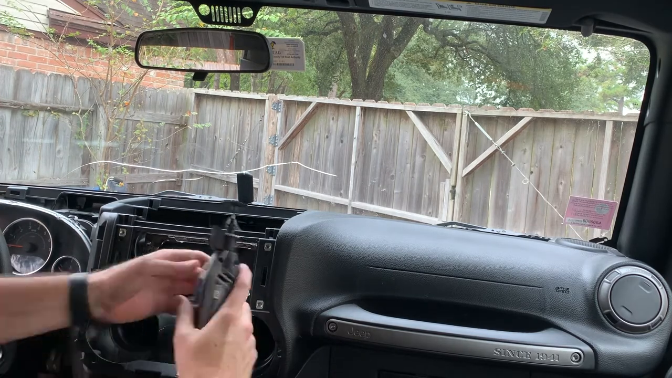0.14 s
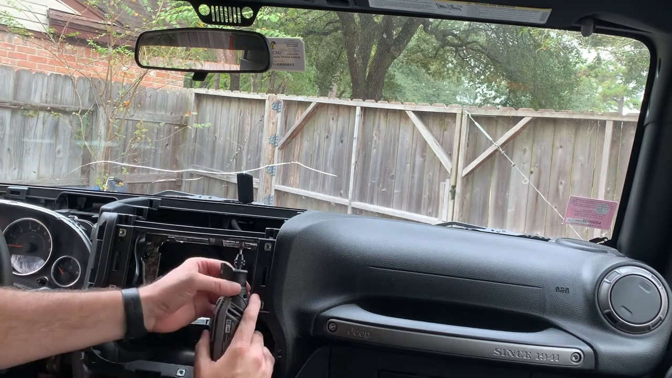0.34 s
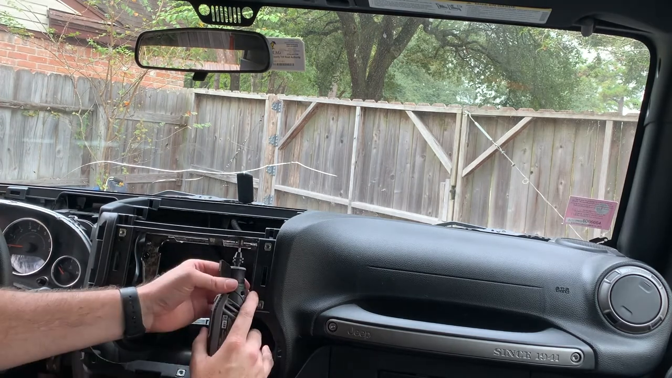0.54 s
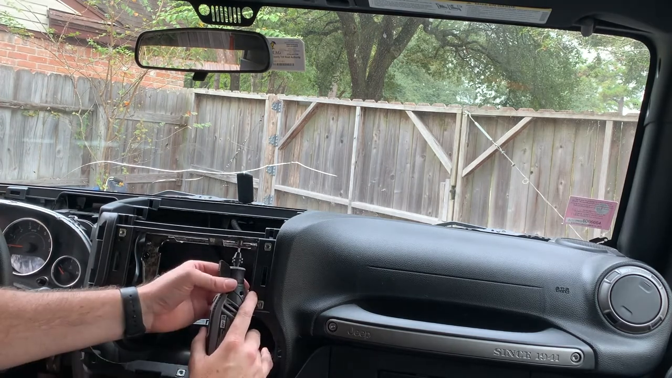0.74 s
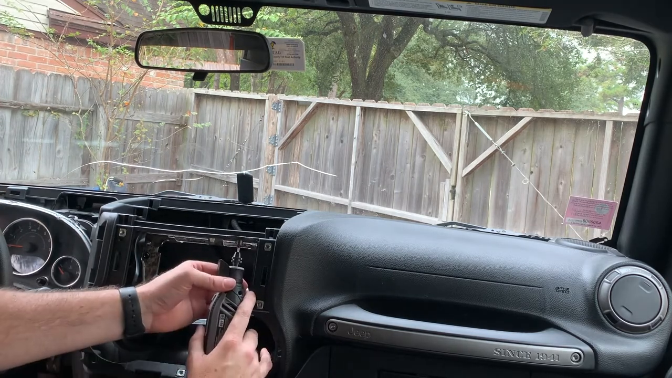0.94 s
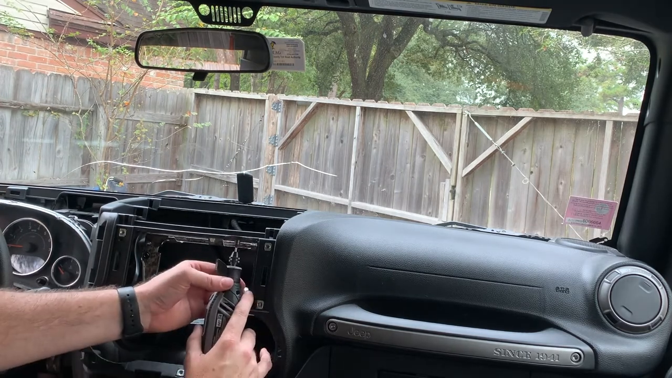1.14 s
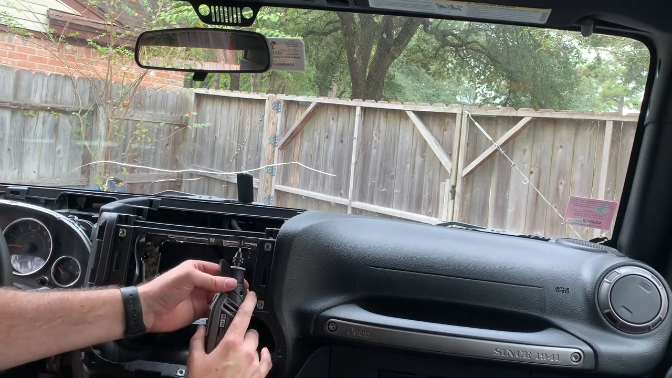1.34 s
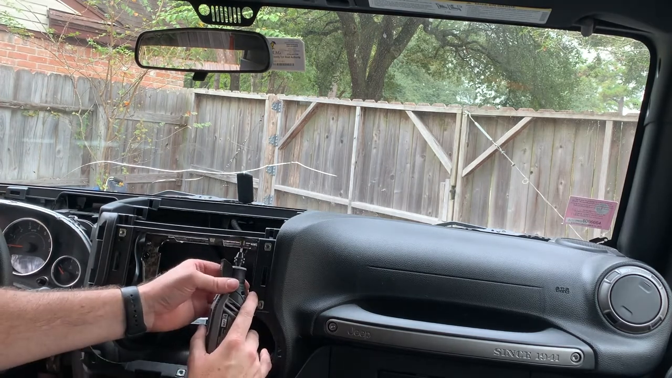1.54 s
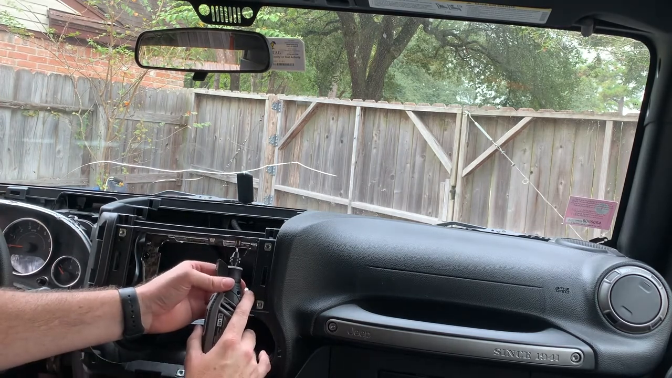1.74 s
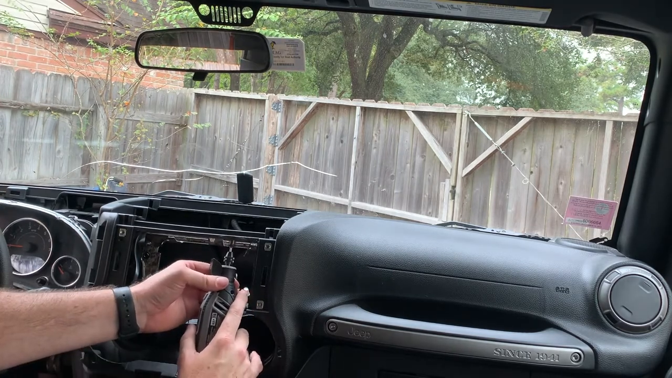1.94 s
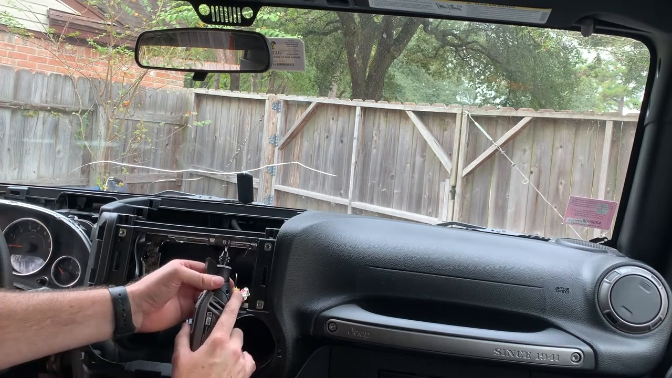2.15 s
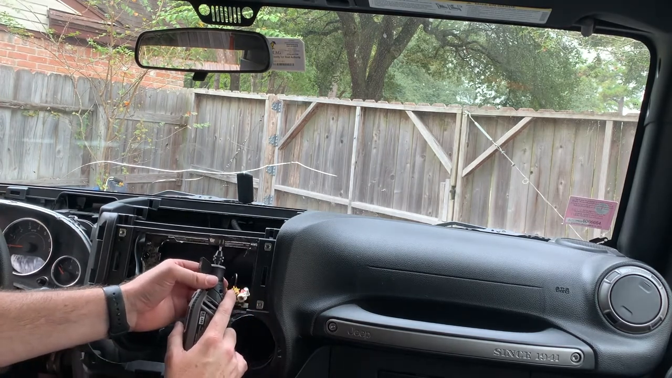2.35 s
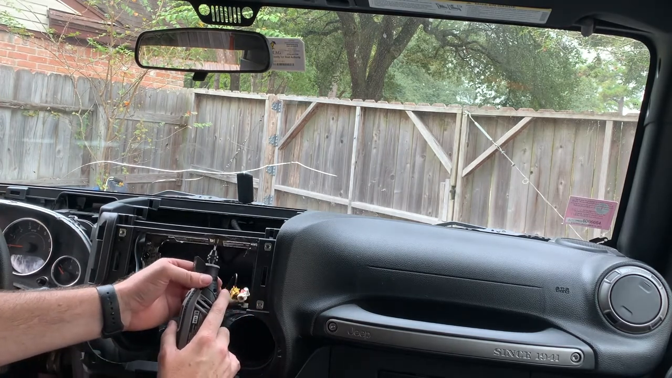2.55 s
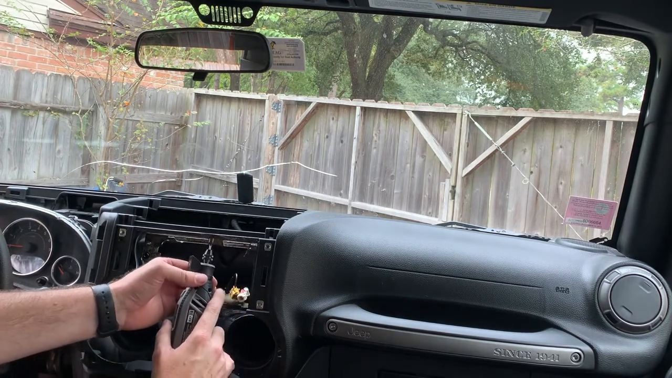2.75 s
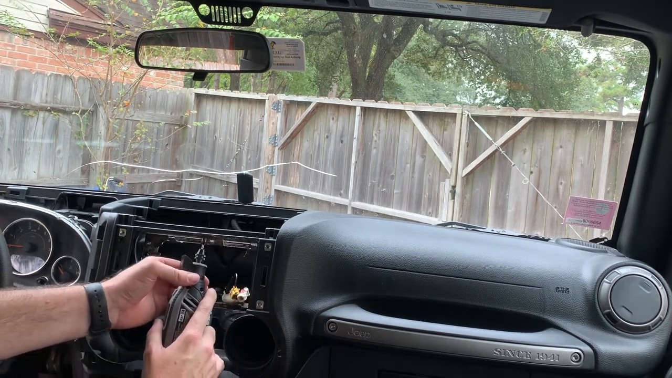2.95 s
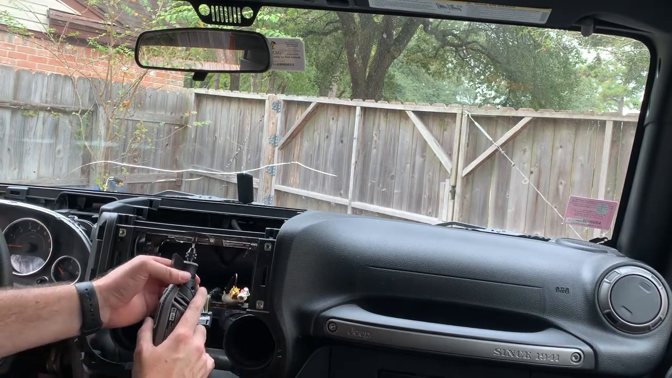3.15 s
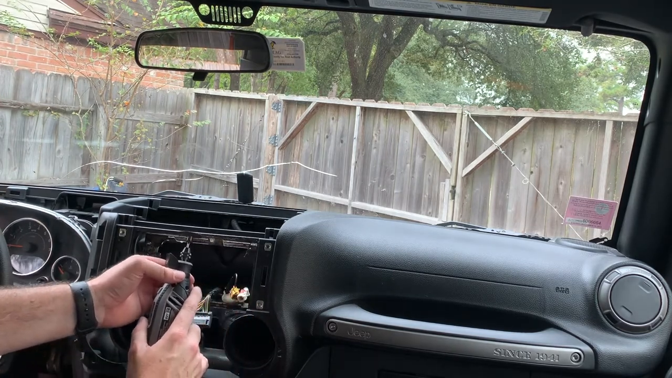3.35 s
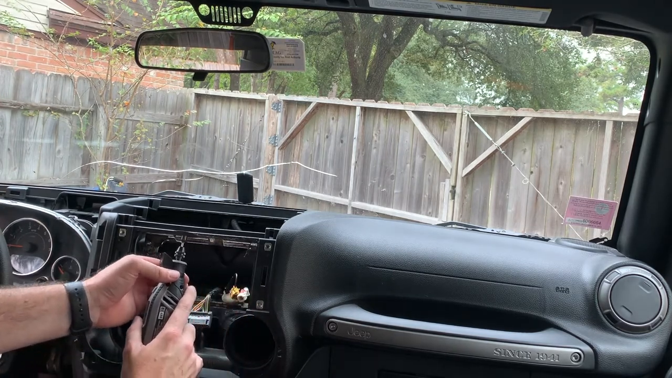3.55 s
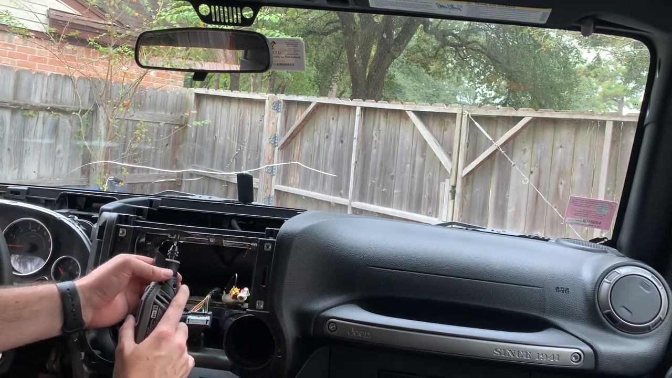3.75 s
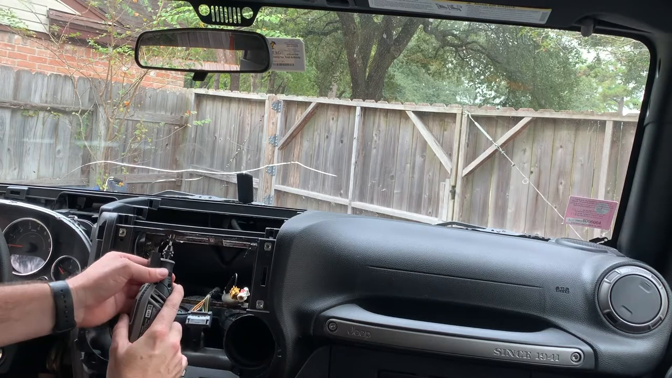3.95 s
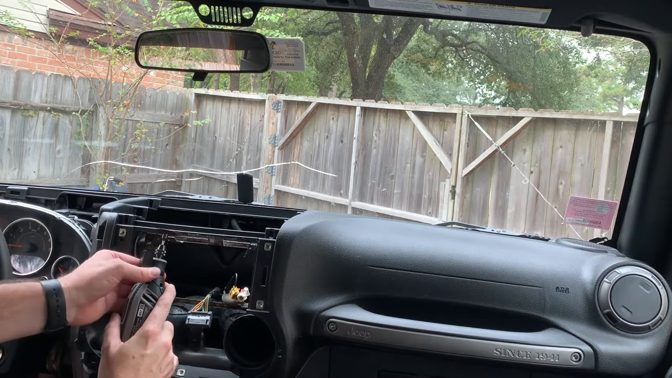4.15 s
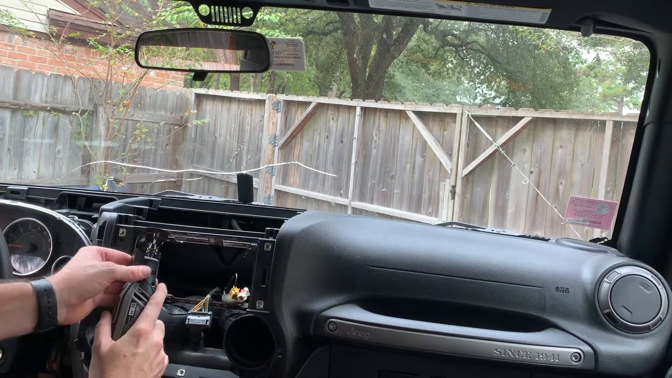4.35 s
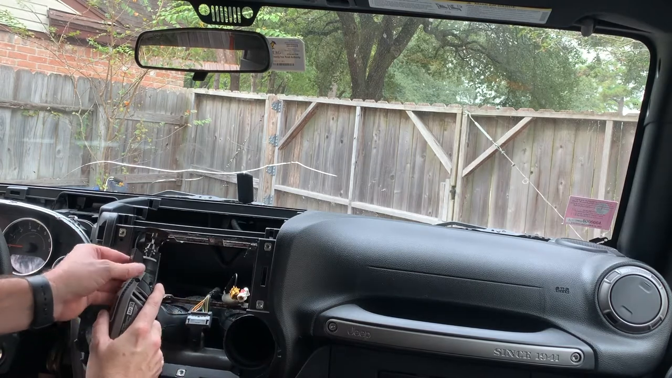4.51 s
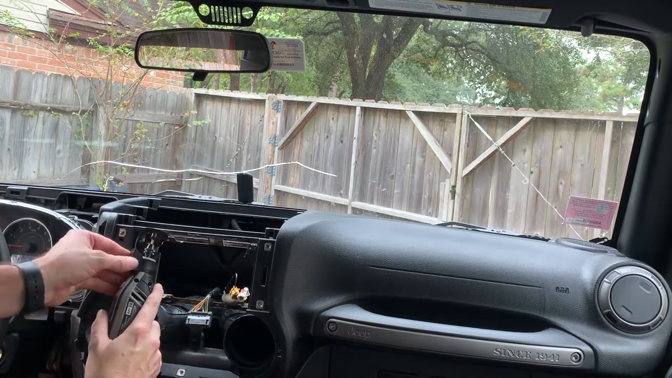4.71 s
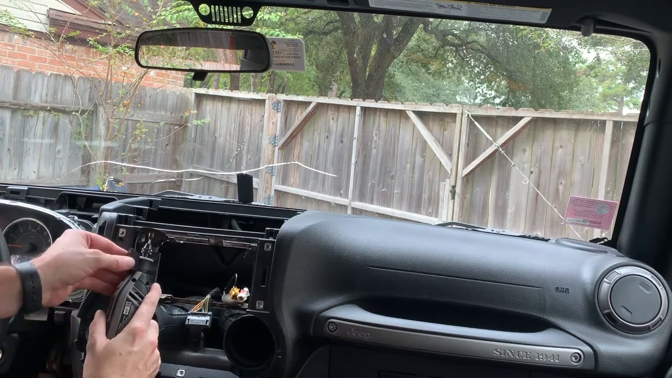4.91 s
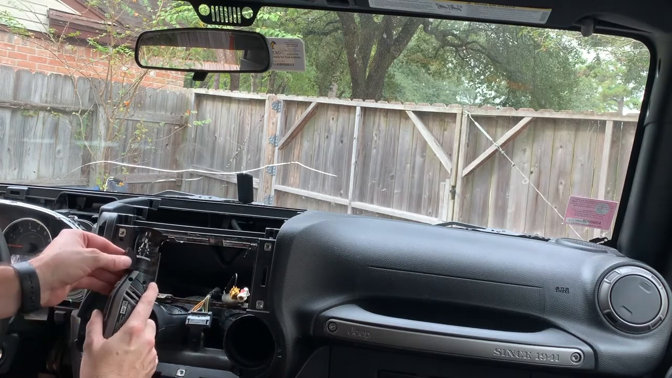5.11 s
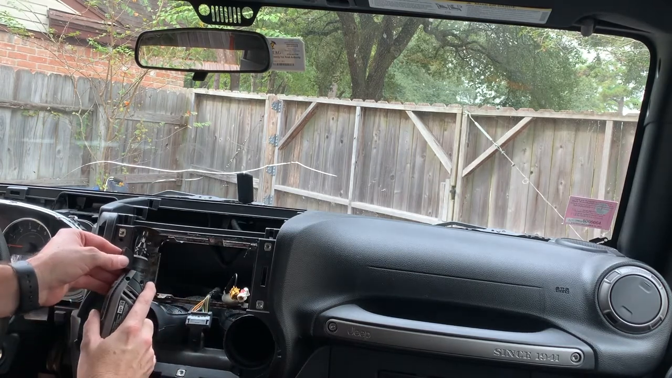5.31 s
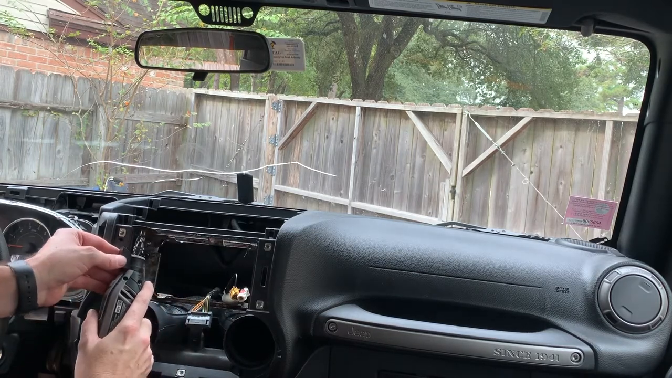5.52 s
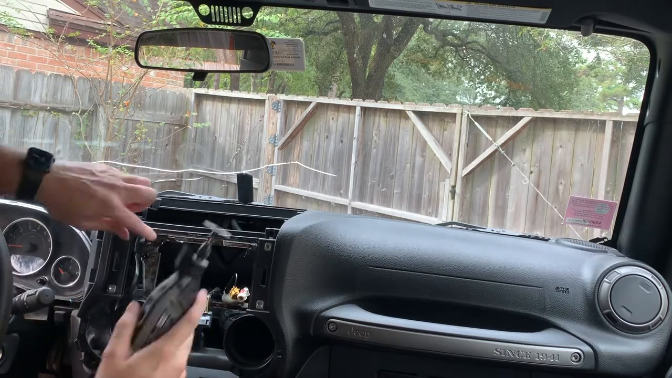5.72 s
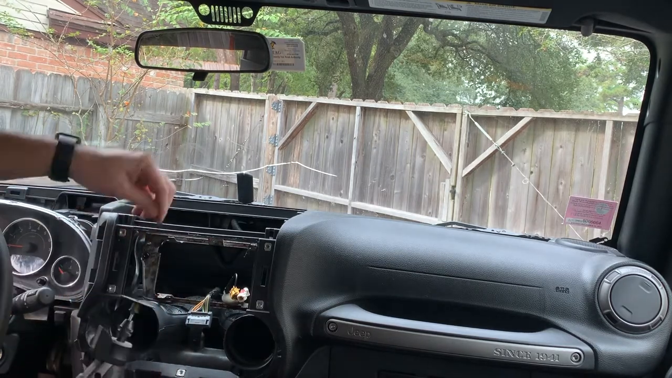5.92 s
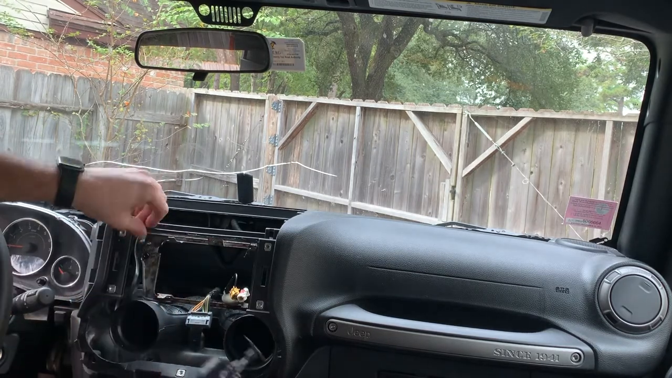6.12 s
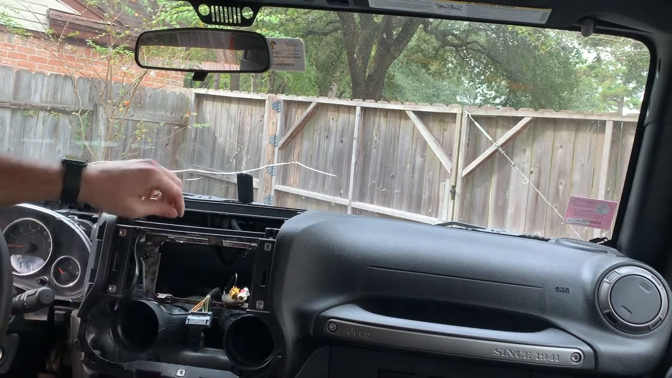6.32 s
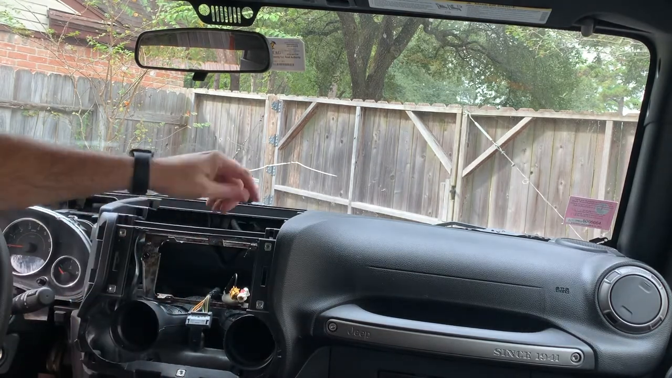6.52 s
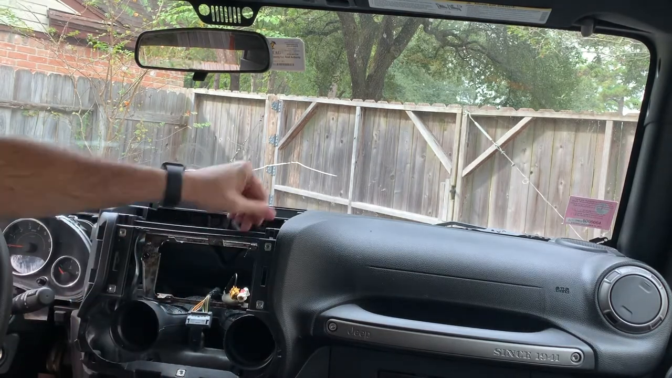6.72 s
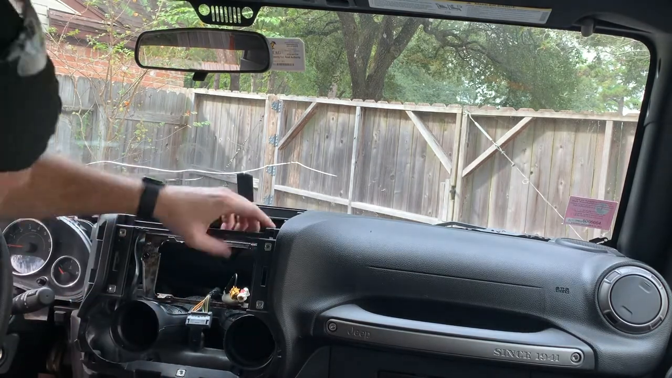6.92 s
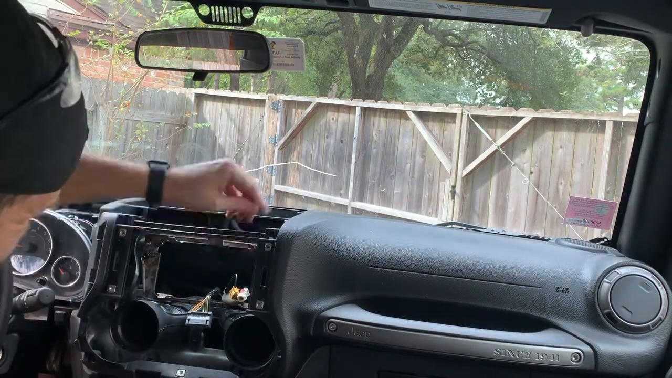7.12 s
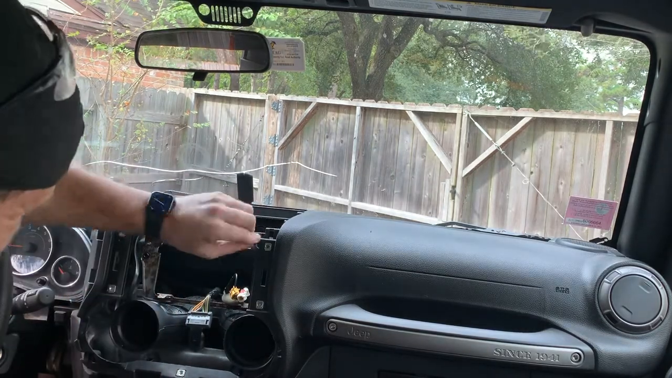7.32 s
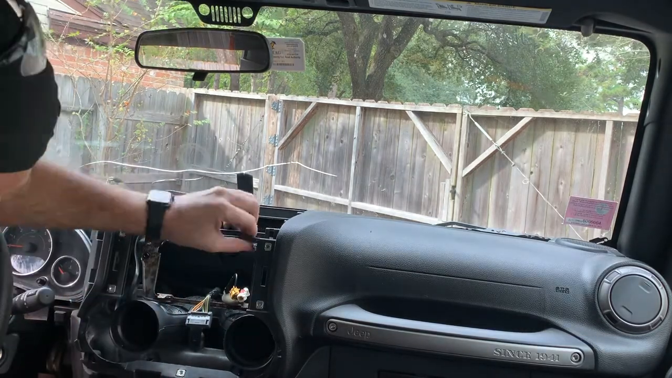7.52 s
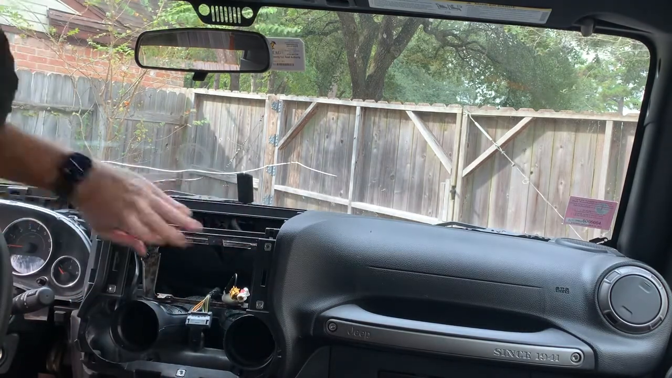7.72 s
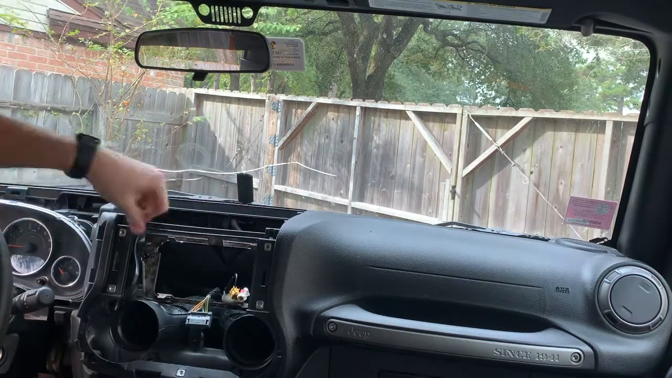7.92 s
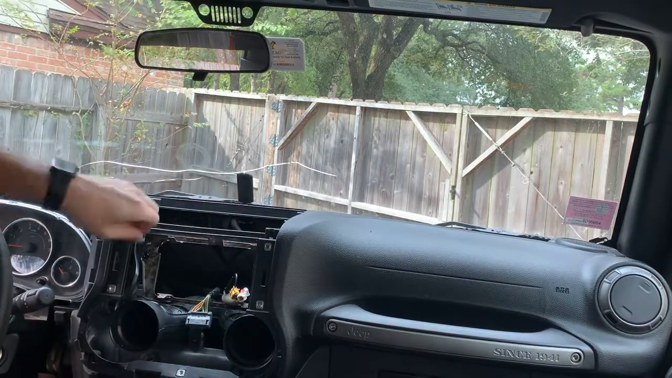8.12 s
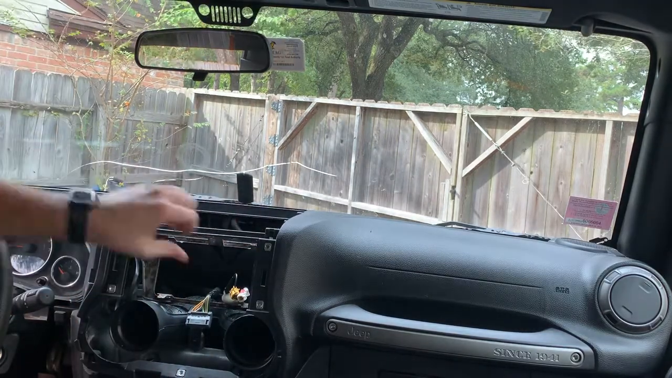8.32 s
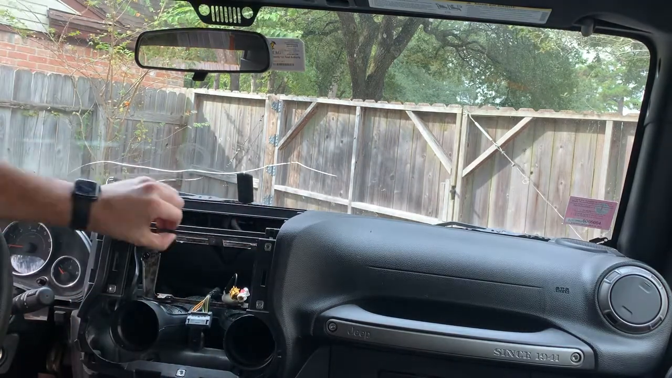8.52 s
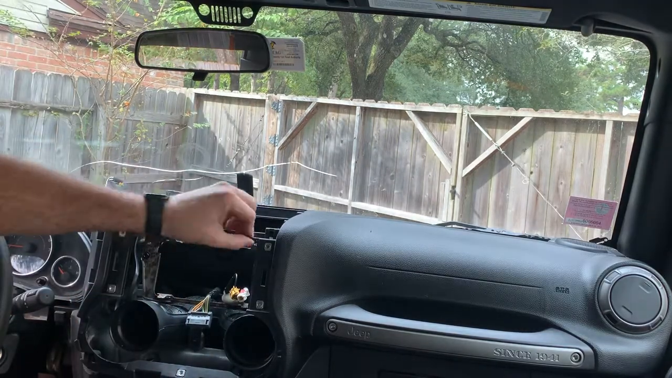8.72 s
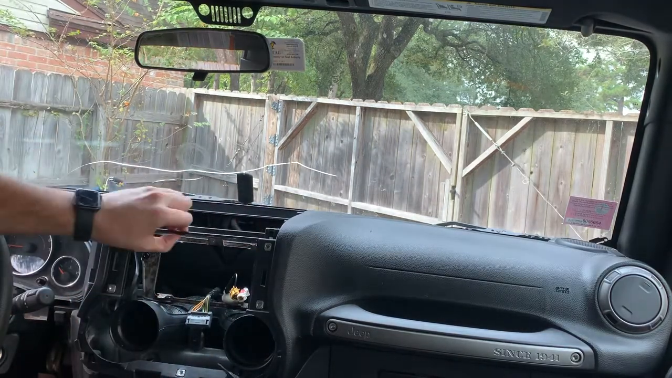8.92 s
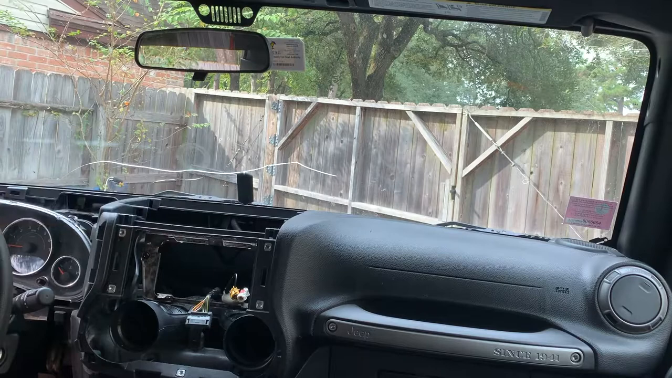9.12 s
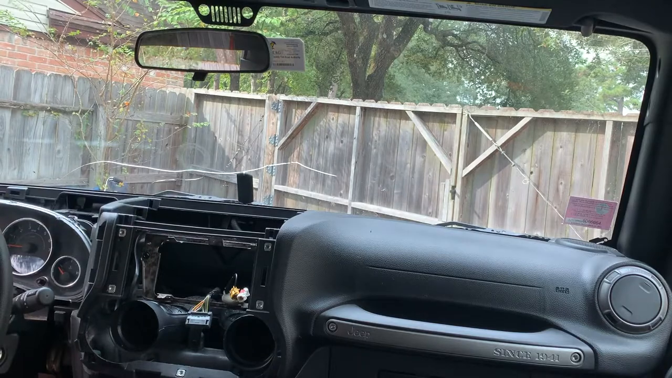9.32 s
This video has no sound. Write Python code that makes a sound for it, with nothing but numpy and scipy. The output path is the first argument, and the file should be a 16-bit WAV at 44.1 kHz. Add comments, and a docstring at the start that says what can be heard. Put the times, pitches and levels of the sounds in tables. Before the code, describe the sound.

A handheld rotary tool whines freely, then bites metal with a rough, wavering buzz and gritty scrape, screams, lifts off, clicks off; light taps follow.

```python
"""In the open dashboard of a parked vehicle, a handheld rotary tool trims a metal bracket.
Above cabin wash and hum, the free motor is a stack of shaft orders with fan air pulsing each turn.
The loaded disc sags in speed; its shaft orders drive the bracket's modes while its grit scrapes.
Lifted off, it spins free, clicks off and runs down; skin slides and decaying modes make
the brushes and taps on the plastic trim, and noise bursts are palms on the housing."""
import sys
import numpy as np
from scipy import signal
from scipy.fft import rfft, irfft, next_fast_len
from scipy.io import wavfile
from scipy.ndimage import uniform_filter1d, map_coordinates

SR = 44100
rng = np.random.default_rng(int(sys.argv[2]) if len(sys.argv) > 2 else 0)


def unload_wav(signal):
    """Save mono or channel-first audio to the path in sys.argv[1] as 16-bit WAV at rate SR, clipped to [-1, 1]."""
    wavfile.write(
        sys.argv[1],
        SR,
        np.round(np.clip(np.atleast_2d(signal).T, -1, 1) * 32767).astype(np.int16),
    )


N = 412776
T = np.arange(N) / SR  # s


def gain_of(db):
    """Logarithmic level: decibels to amplitude."""
    return 10 ** (np.asarray(db) / 20)


def evened(x):
    """Normalisation: scales to an rms of one."""
    return x / np.sqrt(np.mean(abs(x) ** 2) + 1e-20)


def read(points, hz):
    """Spectral envelope: straight lines on a log-frequency axis."""
    f, value = np.transpose(points)
    return np.interp(np.log(hz + 1), np.log(f + 1), value)


def curve(rows, axis=1):
    """Time envelope: one column of a table, interpolated at every sample."""
    rows = np.array(rows)
    return np.interp(T, rows[:, 0], rows[:, axis])


def shaped(x, gain):
    """Linear filtering: multiplies the spectrum of x by a function of frequency."""
    size = next_fast_len(len(x) + 2048)
    spectrum = rfft(x, size) * gain(np.fft.rfftfreq(size, 1 / SR))
    return irfft(spectrum, size)[:len(x)]


def coloured(x, points):
    """Linear filtering by a spectral envelope in dB."""
    return shaped(x, lambda f: gain_of(read(points, f)))


def band_rms(x, lo_hz, hi_hz):
    """Band level: standard deviation of x within a band."""
    return np.std(shaped(x, lambda f: (f > lo_hz) & (f < hi_hz))) + 1e-12


def resonances(modes, f):
    """Resonance: summed gain of modes (pitch_hz, width_hz, level_db), each falling off on both sides."""
    return sum(gain_of(db) / (1 + ((f - hz) / width) ** 2) for hz, width, db in modes)


def wander(rate):
    """Random modulation: interpolated chance of rms one, with a new value rate times a second."""
    return evened(np.interp(T * rate, np.arange(20000), rng.standard_normal(20000)))


def dips(rate, depth_db):
    """Amplitude modulation: a gain that mostly holds near one and drops briefly, by chance."""
    return gain_of(-depth_db * np.clip(wander(rate), 0, 1.5) ** 2)


def held(start, end, attack_s, release_s):
    """Gating envelope: rises around start, holds at one, and falls around end."""
    return np.clip(np.minimum((T - start) / attack_s, (end - T) / release_s) + .5, 0, 1)


def add(mix, s, sound):
    """Superposition: lays a sound into the mix at time s."""
    part = mix[round(s * SR):][:len(sound)]
    part += sound[:len(part)]


# Side signal against mid. Columns: pitch_hz, level_db
SIDE_LEVEL = [(60, -24), (110, -16), (200, -13.5), (380, -24.5), (700, -10.5), (1290, -20.5), (2380, -3),
              (4400, 1), (8120, -3), (15000, 0)]
# First channel against second. Columns: pitch_hz, level_db
LEAN = [(60, -3), (380, 0.5), (1290, 0.5), (2600, -3), (4400, 1.5), (8120, 1.3), (15000, 3)]


def ports(sound, other, likeness=.8, swing=.6):
    """Partial coherence: two ports share a sound in opposite quadrature, plus an unshared part."""
    likeness = np.clip(likeness, 0, 1)
    ripple = lambda f: swing * np.sin(2 * np.pi * f / 1370)
    quadrature = shaped(sound, lambda f: 1j * np.exp(1j * ripple(f)))
    side = coloured(likeness * quadrature + np.sqrt(1 - likeness ** 2) * other, SIDE_LEVEL)
    return np.array([shaped(sound + sign * side, lambda f: gain_of(sign * read(LEAN, f) / 2))
                     for sign in (1, -1)])


# Colour of the parked cabin's wash. Columns: pitch_hz, relative density_db
CABIN_COLOUR = [(15, -90), (25, -50), (53, -60), (80, -31.5), (145, -17.5), (206, -1.5), (405, -11.5),
                (489, -5.5), (545, -14.5), (624, -17.5), (754, -19), (863, -21.5), (936, -26.5),
                (1650, -32), (16000, -64.5)]
# Wavering partials of the hum. Columns: pitch_hz, waver_per_s, level_db
HUM = [(98, 16, -71.5), (173.6, 9, -51.5), (205, 13, -72), (274.8, 27, -52), (444, 8.3, -71),
       (484, 7.8, -56.5), (485, 4.7, -75), (605, 12, -57)]
# A thin tone swelling in the hum. Columns: start_s, end_s, level_db
TONE_SWELLS = [(1.361, 1.694, -38.5), (7.053, 7.852, -44.5)]
# A faint hiss that comes up late. Columns: time_s, level_db
HISS = [(9.15, -82), (9.22, -60.5), (9.36, -63)]
# Colour of that hiss. Columns: pitch_hz, relative density_db
HISS_COLOUR = [(2350, -42), (4000, -9), (7270, -17), (9280, -2), (10700, -9), (14000, -2.5), (16000, -12)]
CABIN_DB = -43
TONE_HZ, TONE_EDGE_S = 477, 0.053


def cabin():
    """Narrowband noise: a wash and wavering hum, alike at both ports in the bass, and late hiss."""
    wash, stray = (gain_of(CABIN_DB) * evened(coloured(rng.standard_normal(N), CABIN_COLOUR))
                   for _ in range(2))
    hum = np.zeros(N)
    for hz, waver, db in HUM:
        envelope = wander(waver) + 1j * wander(waver)
        hum += gain_of(db) * (envelope * np.exp(2j * np.pi * hz * T)).real
    swells = sum(gain_of(db) * held(start, end, TONE_EDGE_S, TONE_EDGE_S)
                 for start, end, db in TONE_SWELLS)
    tone = np.sqrt(2) * np.sin(2 * np.pi * TONE_HZ * T + .3 * wander(9))
    tone *= swells * gain_of(1.5 * wander(12))
    side = coloured(stray, [(400, -19), (1200, -3), (3000, 5.5), (9000, 3.0)])
    hiss = [gain_of(curve(HISS)) * evened(coloured(rng.standard_normal(N), HISS_COLOUR))
            for _ in range(2)]
    return wash + hum + tone + np.array([side, -side]) + hiss


# Palms rubbing and bumping. Columns: start_s, end_s, level_db, fade_s
GRIPS = [(-0.15, 0.5, -44, 0.2), (5.54, 5.606, -36, 0.022), (6.812, 6.846, -41, .008),
         (7.71, 7.745, -43, .01), (8.169, 8.204, -41, 0.0071)]
# Colour of the rubbing. Columns: pitch_hz, relative density_db
GRIP_COLOUR = [(30, -65), (100, -20), (300, 7.5), (560, -18), (900, -9), (2000, -57), (6000, -70)]


def grip(uneven_db=3):
    """Friction noise: palms rub and bump on the housing and the dashboard."""
    level = sum(gain_of(db) * held(start, end, fade, fade) for start, end, db, fade in GRIPS)
    rubbing = evened(coloured(rng.standard_normal(N), GRIP_COLOUR))
    return level * gain_of(uneven_db * wander(25.7)) * rubbing


# Mean shaft speed, sagging as the hand presses the disc on. Columns: time_s, turns_hz
SPEED = [(0.015, 536), (0.125, 480), (0.23, 466.8), (0.64, 463.5), (0.685, 448), (0.775, 329),
         (0.83, 387.8), (0.855, 391.6), (0.88, 381.8), (0.9, 351.0), (0.93, 325.9), (1.0, 328.6),
         (1.02, 302.8), (1.08, 314.2), (1.125, 309.0), (1.18, 320.8), (1.2, 302.7), (1.235, 294.5),
         (1.265, 299.3), (1.28, 294.3), (1.32, 307.7), (1.34, 287.1), (1.38, 275.1), (1.425, 297.2),
         (1.47, 295.8), (1.485, 269.8), (1.495, 263.5), (1.51, 270.3), (1.535, 266.3), (1.565, 297.7),
         (1.615, 318.0), (1.65, 290.8), (1.67, 296.6), (1.685, 311.9), (1.71, 359.9), (1.735, 357.6),
         (1.76, 328.1), (1.79, 312.7), (1.835, 354.3), (1.885, 368.4), (1.9, 359.3), (1.925, 366.2),
         (1.945, 358.4), (1.965, 370.5), (2.015, 342.9), (2.055, 332.7), (2.075, 318.2), (2.095, 313.9),
         (2.14, 321.8), (2.165, 311.1), (2.19, 321.7), (2.29, 316.6), (2.305, 307.6), (2.43, 309.0),
         (2.445, 298.8), (2.54, 299.8), (2.56, 287.0), (2.655, 298.7), (2.67, 290.3), (2.79, 287.3),
         (2.82, 276.9), (2.86, 277.0), (2.885, 288.9), (2.955, 276.5), (2.98, 288.4), (3.05, 283.8),
         (3.125, 268.2), (3.15, 285.6), (3.175, 284.5), (3.21, 263.7), (3.27, 288.2), (3.335, 294.5),
         (3.355, 301.5), (3.415, 265.4), (3.45, 270.9), (3.465, 279.4), (3.51, 287.3), (3.55, 279.9),
         (3.57, 285.6), (3.615, 279.9), (3.64, 266.2), (3.68, 234.8), (3.72, 269.4), (3.75, 269.0),
         (3.795, 252.5), (3.81, 251.9), (3.83, 238.7), (3.855, 238.1), (3.94, 277.6), (3.96, 269.4),
         (4.06, 266.7), (4.075, 276.5), (4.13, 278.9), (4.17, 266.5), (4.19, 274.9), (4.205, 270.4),
         (4.23, 281.7), (4.25, 274.8), (4.34, 273.4), (4.355, 267.6), (4.375, 276.5), (4.39, 270.0),
         (4.435, 283.8), (4.51, 282.9), (4.54, 291.6), (4.68, 269.3), (4.72, 279.0), (4.79, 269.6),
         (4.81, 276.8), (4.845, 303.3), (4.875, 283.2), (4.925, 282.6), (4.955, 273.8), (4.99, 253.6),
         (5.005, 237.2), (5.02, 228.9), (5.055, 234.3), (5.075, 224.6), (5.095, 235.9), (5.18, 229.1),
         (5.205, 241.2), (5.245, 226.3), (5.265, 229.5), (5.285, 224.8), (5.3, 230.0), (5.325, 224.9),
         (5.35, 235.5), (5.39, 226.5), (5.425, 236.8), (5.475, 225.6), (5.525, 233.9), (5.59, 246),
         (5.66, 375), (5.76, 448.7), (6.485, 500.5)]
# The switch. Values: time_s, level_db
SWITCH = (6.4562, -16.5)
FREE_HZ = 486.5  # speed without load, from which the sag is counted
HUNT_SHARE, HUNT_PER_S = .005, 60  # waver as a share of the sag, and its rate
COAST_HZ_PER_S, COAST_DB_PER_S = 370, 64  # running down after the switch


def shaft():
    """Torque balance: speed follows the hand's pressure, wavers under load, and runs down when off."""
    sag = np.maximum(FREE_HZ - curve(SPEED), 0)
    coast = COAST_HZ_PER_S * np.clip(T - SWITCH[0], 0, 1)
    return curve(SPEED) + HUNT_SHARE * sag * wander(HUNT_PER_S) - coast


def reflections(x, depth_db, span_hz=170, seconds=0.2918):
    """Comb-like interference: dashboard echoes ripple the spectrum, drifting as the hand moves."""
    hz, t, z = signal.stft(x, SR, nperseg=1024, noverlap=768)
    grid = np.meshgrid(hz / span_hz, t / seconds, indexing="ij")
    ripples = map_coordinates(rng.standard_normal((256, 96)), grid, order=1, mode="wrap")
    rippled = z * gain_of(depth_db * evened(ripples))
    return evened(signal.istft(rippled, SR, nperseg=1024, noverlap=768)[1][:N])


# Times at which the disc moves on to the next place along the cut. Column: time_s
MOVES = [1.65, 2.52, 4.79]


def recoloured(x, before, after):
    """Spectral crossfade: the free motor's colour before the cut, changing during it to that after."""
    changed = np.clip(T - MOVES[1], 0, 1)
    return (1 - changed) * evened(coloured(x, before)) + changed * evened(coloured(x, after))


# Relative level of the motor's cooling air and whine. Columns: time_s, level_db
AIR = [(0, -45), (.3, -47), (6.1, -47), (6.23, -45)]
# Low orders of the motor. Columns: multiple of the shaft speed, relative level_db
MOTOR = [(1, -54), (3, -63), (6, -68)]
# Gain of the low orders over time. Columns: time_s, level_db
MOTOR_LEVEL = [(0.25, -1.5), (0.45, 6), (0.7, 8.5), (5.6, -8)]
# Which high orders stand out before the cut. Columns: pitch_hz, relative level_db
WHINE_BEFORE = [(2000, -23), (3600, -7.5), (4700, -7.5), (6000, -23), (7800, 4.5), (8300, -1), (8750, 5.5),
                (9200, -11), (9700, 6), (10150, -2), (10650, 4), (11100, -13), (11700, 5.5), (13300, -8),
                (15300, 0)]
# Which high orders stand out after the cut. Columns: pitch_hz, relative level_db
WHINE_AFTER = [(2000, -23.5), (3200, -15), (4400, -13.5), (5200, -21.5), (7500, -10.5), (8900, -1),
               (10000, -2.5), (10900, -8.5), (11800, 0), (13400, -15.5), (15000, 0), (16000, -6)]
# Colour of the cooling air before the cut. Columns: pitch_hz, relative density_db
AIR_BEFORE = [(900, -19.5), (1420, 4), (2100, -17), (2800, -0.5), (3500, -13), (4800, 1.5), (5900, -31.5),
              (6500, -7), (7700, -2.5), (9200, -1), (10900, -9), (12100, -6.5), (13400, -5), (15100, -1),
              (16000, -16)]
# Colour of the cooling air after the cut. Columns: pitch_hz, relative density_db
AIR_AFTER = [(900, -21), (1420, 1.5), (2100, -16), (2800, -8.5), (3500, -12.5), (4300, -8), (5100, -14.5),
             (6300, -5), (7400, -10), (9100, -1.5), (10900, -9), (11900, -2.5), (13400, -12), (15100, -2),
             (16000, -16)]


def motor(speed, whine_db=-5.0, air_db=-3, flutter=1.0, buzz=0.66):
    """Rotating-machine orders: a tall stack of shaft multiples with fan air pulsing each turn."""
    turns = np.cumsum(speed * (1 + .0024 * wander(140))) / SR
    running = np.interp(T, [6.44, 6.6, 6.68], [1, 1, 0])
    powered = np.interp(T, [6.44, 6.58], [1, 0])
    level = gain_of(curve(AIR) - COAST_DB_PER_S * np.maximum(T - SWITCH[0], 0)) * running
    # play in the bearings makes every order flutter on its own
    stack = sum((1 + flutter * wander(50)) * np.cos(2 * np.pi * (k * turns + rng.random()))
                for k in range(5, 34))
    whine = gain_of(whine_db) * powered * recoloured(stack, WHINE_BEFORE, WHINE_AFTER)
    gusts = 1 + buzz * np.cos(2 * np.pi * turns)
    air, stray = (gain_of(air_db) * recoloured(reflections(gusts * rng.standard_normal(N), depth_db=4.0),
                                               AIR_BEFORE, AIR_AFTER) for _ in range(2))
    low = sum(gain_of(db + 2 * wander(9.0)) * np.sqrt(2) * np.cos(2 * np.pi * k * turns)
              for k, db in MOTOR)
    low = powered * gain_of(curve(MOTOR_LEVEL)) * low
    return ports(level * (air + whine) + low, level * stray, likeness=0.67)


# Fingers and tool on the trim.
# Columns: start_s, relative level_db, treble_db against body, scuff_t60_s, nominal spot_hz
TAPS = [(0.108, -51, -12, .06, 2400), (0.293, -34.5, -22, 0.037, 1240), (0.3587, -47, -10, 0.085, 1360),
        (6.4907, -46.5, -9, 0.15, 1310), (6.526, -50, -8, 0.044, 2800), (6.6338, -42, -24, 0.08, 1330),
        (6.6567, -47.5, -13, 0.052, 2350), (6.742, -48, -16, .17, 937), (6.814, -42, -31, .08, 1150),
        (6.8358, -46, -18, 0.092, 1690), (6.91, -49, -31, 0.08, 836), (6.932, -52, -24, .05, 2450),
        (7.13, -48.5, -6.5, 0.063, 2540), (7.448, -47, -37, 0.066, 1440), (7.5708, -46.5, -28, 0.09, 1330),
        (7.6177, -46.5, -32, 0.056, 1670), (7.636, -52, -25, 0.036, 1600), (7.722, -50, -20, 0.11, 1420),
        (7.753, -50, -4, 0.11, 1510), (7.878, -57, -3, .04, 1500), (7.893, -47, -22, 0.069, 1400),
        (7.909, -41.5, -20, 0.13, 1660), (7.964, -44, -20, .07, 1430), (7.981, -48, -25, 0.036, 1600),
        (8.054, -47.5, -27, 0.087, 1500), (8.1665, -38, -20, 0.016, 1424), (8.17, -47, -34, 0.02, 1170),
        (8.6968, -46, -21, 0.089, 845), (9.08, -57, -1, 0.045, 1390)]
# Nominal modes of the trim. Columns: pitch_hz, width_hz, relative level_db
TRIM = [(665, 110, -4), (914, 120, -2.5), (1330, 164, 9), (1680, 170, 3.5), (2610, 140, -5.5),
        (3170, 120, -14), (4280, 180, -14)]
SLIPS_PER_S = 330  # tiny slips of a finger on the trim


def taps(scuff_db=2.0, tick_db=-6, snap_db=-8, spot_db=4, spot_width_hz=90):
    """Modal impact and stick-slip: each touch knocks, then slips that ring the plastic and the spot."""
    out, t = np.zeros(N), np.arange(SR // 5) / SR
    rise_s, snap_s, press_s, vary_db = .002, .0006, .001, 2.5
    tick_colour = [(2000, -1), (4500, 11.0), (9000, 11.0), (16000, -10.0)]
    for s, db, treble_db, t60, spot_hz in TAPS:
        knock = np.zeros(len(t))
        for hz, width, level in TRIM + [(spot_hz, spot_width_hz, spot_db)]:
            decay = gain_of(level + vary_db * rng.standard_normal()) * np.exp(-np.pi * width * t)
            detuned_hz = hz * rng.uniform(0.955, 1.04)
            knock += decay * np.sin(2 * np.pi * detuned_hz * t) * rng.choice([-1, 1])
        knock *= 1 - np.exp(-t / press_s)  # the soft fingertip rounds the onset
        slips = evened(rng.choice([-1, 1], len(t)) * (rng.random(len(t)) < SLIPS_PER_S / SR))
        scuff = evened(signal.fftconvolve(slips, knock)[:len(t)])
        swell = (1 - np.exp(-t / rise_s)) * gain_of(-60 * t / max(t60, .01))
        snap = gain_of(snap_db) * np.exp(-t / snap_s) * rng.standard_normal(len(t))
        scratch = gain_of(tick_db) * swell * evened(slips + rng.standard_normal(len(t)))
        tick = gain_of(min(treble_db, 0)) * coloured(snap + scratch, tick_colour)
        add(out, s, gain_of(db) * (knock + gain_of(scuff_db) * swell * scuff + tick))
    # small plastic parts radiate little bass
    return ports(shaped(out, lambda f: f ** 2 / (f ** 2 + 300 ** 2)), np.zeros(N), likeness=0.88)


# The disc bites once, bounces clear, then stays on the metal.
# Columns: start_s, end_s, relative force_db of the tones, relative grit_db, easing_off_s
CONTACTS = [(0.702, 0.799, 7, -7, 0.063), (0.819, 5.64, 0, 0, 0.05)]
# The disc snags and the second order drops. Columns: start_s, end_s, level_db
SNAGS = [(3.107, 3.144, -19), (3.201, 3.243, -7.5), (3.414, 3.468, -9), (3.541, 3.559, -0.5),
         (3.647, 3.718, -8), (3.73, 3.816, -13), (4.019, 4.07, -12), (4.166, 4.178, -18),
         (4.641, 4.676, -12), (4.88, 4.908, -7)]
# The chatter is rougher for a while. Values: start_s, end_s, added roughness (0-1)
ROUGHER = (1.3, 1.85, .09)
BITE_S, LIFT_S, SNAG_S = 0.0068, 0.023, 0.019  # rise and fall of a contact, edges of a snag
SWELL_S = 0.035  # rise and fall of band swells, sprays and the rougher stretch
# roughness (0-1): steady, then added as the speed lurches, the bracket screams or the disc snags
ROUGH_STEADY, ROUGH_LURCH, ROUGH_SCREAM, ROUGH_SNAG = .16, .08, .08, .09
LURCH_HZ_PER_S = 459
FIRST_BITE_SHARE = .5  # the first bite is cleaner


def roughness(screaming):
    """Cutting instability: how unevenly the disc bites, 0-1."""
    lurch = uniform_filter1d(abs(np.gradient(curve(SPEED))) * SR, size=SR // 5)
    snagging = sum(held(start, end, SNAG_S, SNAG_S) for start, end, _ in SNAGS)
    rough = ROUGH_STEADY + ROUGH_LURCH * np.tanh(lurch / LURCH_HZ_PER_S)
    rough = rough + ROUGH_SNAG * snagging + ROUGH_SCREAM * screaming
    rough = rough + ROUGHER[2] * held(ROUGHER[0], ROUGHER[1], SWELL_S, SWELL_S)
    first_bite = T < CONTACTS[1][0] - BITE_S
    return np.clip(rough * np.where(first_bite, FIRST_BITE_SHARE, 1), 0, 1)


def along_cut(x, colours, lo_hz, hi_hz):
    """Driving-point response: passes x through the bracket's colour at the place where the disc is."""
    passed = [1] + [np.clip((T - s) / 0.16 + .5, 0, 1) for s in MOVES] + [0]
    parts = [coloured(x, colour) for colour in colours]
    return sum((passed[k] - passed[k + 1]) * part / band_rms(part, lo_hz, hi_hz)
               for k, part in enumerate(parts))


# The bracket's ring at the first place along the cut. Columns: pitch_hz, relative level_db
RING_TOP = [(380, -36), (650, -19), (780, 1.5), (980, 8.5), (1200, 1.5), (1530, 7.5), (2150, -13.5),
            (2450, -2.5), (2750, -2.5), (3100, -10.5), (3650, -14), (4380, -4.5), (4800, -13), (5300, -9),
            (6000, -22), (7000, -41)]
# Its ring at the second place. Columns: pitch_hz, relative level_db
RING_CORNER = [(380, -38), (650, 1.5), (980, 9), (1300, 5.5), (1600, 13), (2030, -8), (2230, 3.5),
               (2380, -13), (2550, 9), (2850, 1.5), (3180, 5), (3600, -32), (4330, 2), (4800, 0.5),
               (5200, -3), (7000, -48)]
# Its ring at the third place. Columns: pitch_hz, relative level_db
RING_SIDE = [(380, -31.5), (650, -14), (830, 1), (1000, -5.5), (1150, 1), (1400, 1.5), (1660, 4),
             (2100, -13.5), (2580, -11), (3000, -10), (3500, -15), (4200, -8.5), (5200, -24), (7000, -43)]
# Its ring at the last place. Columns: pitch_hz, relative level_db
RING_END = [(380, -44), (650, -8.5), (900, -6), (1150, 0), (1400, -2), (1650, -2.5), (1790, -15),
            (1920, -11), (2200, -9), (2600, -4.5), (3050, -7.5), (3400, -10), (3870, -24), (4400, -13.5),
            (5200, -27.5), (6760, -50), (11400, -120)]


def chatter(turns, rough, flutter_rate=45, drift_db=2.0):
    """Forced vibration: shaft orders ring the bracket; uneven bites smear them with puffs of noise."""
    turn = np.exp(2j * np.pi * turns)
    flutter = .24 + rough
    blows, order = np.zeros(N), turn * turn
    for k in range(3, 23):
        order = order * turn
        sway = 1 + flutter * (wander(flutter_rate) + 1j * wander(flutter_rate))
        phase = np.exp(2j * np.pi * rng.random())
        blows += (order * sway * gain_of(drift_db * wander(7)) * phase).real
    puffs = (0.21 + np.exp(-(turns % 1) / 0.34)) * rng.standard_normal(N)
    drive = (1 - rough) * blows / band_rms(blows, 640, 2300)
    drive += rough * puffs / band_rms(puffs, 1100, 2000)
    ring = along_cut(drive, [RING_TOP, RING_CORNER, RING_SIDE, RING_END], 700, 2100)
    # the orders trade energy among themselves: their total is evened out over time
    core = shaped(ring, lambda f: (f > 700) & (f < 2100))
    return ring / np.sqrt(abs(uniform_filter1d(core ** 2, size=3000)) + 1e-6)


# Bands of the chatter that grow louder or softer for a while.
# Columns: start_s, end_s, pitch_hz, width_hz, gain_db
BAND_SWELLS = [(0.7, 0.77, 2640, 200, 5), (0.82, 0.9, 1550, 200, -7), (0.81, 0.91, 3300, 450, -14),
               (0.92, 1.06, 2680, 130, 9), (0.943, 1.01, 1660, 130, 1), (1.074, 1.283, 1540, 110, 4),
               (1.05, 1.18, 4400, 120, 1), (1.075, 1.286, 990, 250, -10), (1.335, 1.45, 1420, 110, 3),
               (1.33, 1.445, 2550, 300, -7), (1.553, 1.68, 900, 120, 5.5), (1.69, 1.84, 2560, 200, 3.5),
               (1.692, 1.845, 1090, 250, -8), (1.8, 1.985, 3130, 130, 4), (1.994, 2.143, 1010, 129.6, 6),
               (2.06, 2.304, 3140, 130, 7.5), (2.137, 2.45, 970, 120, 1), (2.795, 2.974, 1560, 220, 6.5),
               (2.97, 3.19, 1690, 100, 3.5), (3.19, 3.264, 1520, 180, 8.5), (3.27, 3.35, 1560, 220, -10.5),
               (3.383, 3.45, 1590, 150, 8), (3.47, 3.603, 2590, 130, 6.5), (3.926, 4.007, 1614, 170, 11),
               (4.062, 4.27, 1685, 100, 5), (4.052, 4.38, 2540, 129.5, 8), (4.28, 4.346, 1570, 170, 11),
               (4.443, 4.542, 1570, 220, -3), (4.83, 4.93, 1570, 218.2, -0.5), (4.86, 4.96, 2010, 110, 8),
               (5.53, 5.64, 2430, 600, -18)]


def band_swelled(blows):
    """Time-varying equalisation: raises or lowers one band of the chatter for a moment."""
    out = blows.copy()
    for start, end, hz, width, db in BAND_SWELLS:
        part = blows[int((start - SWELL_S / 2) * SR):int((end + SWELL_S / 2) * SR)]
        band = shaped(part, lambda f: resonances([(hz, width, 0)], f))
        fade = signal.windows.tukey(len(band), 2 * SWELL_S * SR / len(band))
        add(out, start - SWELL_S / 2, (gain_of(db) - 1) * band * fade)
    return out


# Share of the grit that comes round again each turn. Columns: pitch_hz, share (0-1)
REPEATS = [(2000, .93), (3300, .9), (4800, .75), (8000, .55), (16000, .5)]
WEAR_PER_S = 70  # renewals of the grain pattern


def rim(turns):
    """Cyclic repetition: the same grains come round each turn and slowly wear; fresh ones join them."""
    face = rng.standard_normal((int(T[-1] * WEAR_PER_S) + 2, 170))
    where = [T * WEAR_PER_S, turns % 1 * face.shape[1]]
    old = evened(map_coordinates(face, where, order=1, mode="grid-wrap"))
    fresh = shaped(rng.standard_normal(N), lambda f: np.sqrt(1 - read(REPEATS, f) ** 2))
    return shaped(old, lambda f: read(REPEATS, f)) + fresh


# Scraping grit at the first place along the cut. Columns: pitch_hz, relative density_db
GRIT_TOP = [(1200, -41), (2100, -5.5), (2700, -7), (3300, -10.5), (3750, -14.5), (4300, -1), (5900, -18.5),
            (7000, 1), (7700, -4), (8450, 3.5), (9250, -2.5), (11600, -2), (13300, -13), (14700, 0),
            (16000, -14)]
# Grit at the second place. Columns: pitch_hz, relative density_db
GRIT_CORNER = [(1200, -35), (2100, -2), (2500, 1.5), (3200, -16), (3550, -5.5), (4400, -10), (6000, -14.5),
               (7000, -3), (11000, -1), (13600, -9.5), (15300, -3.5), (16000, -14)]
# Grit at the third place. Columns: pitch_hz, relative density_db
GRIT_SIDE = [(1200, -36), (2150, -5), (2600, 2), (3450, -14), (3950, -9.5), (6000, -5), (6450, -8.5),
             (6900, -0.5), (7840, -3.5), (8630, -7.5), (9920, -4.5), (12700, -10), (15200, -6.5),
             (16000, -9.5)]
# Grit at the last place. Columns: pitch_hz, relative density_db
GRIT_END = [(1180, -32.5), (2000, 4.5), (2180, -47), (2550, -2), (3490, -14), (3810, -2.5), (5250, -8.5),
            (6040, -4.5), (6530, -12), (7060, -6), (8700, -6), (9090, -14), (10400, -5.5), (15100, -15.5),
            (16000, -10)]
# Modes that sing in the grit for a while. Columns: start_s, end_s, pitch_hz, width_hz, relative level_db
SINGING = [(0.847, 1.3, 7050, 60, -9.5), (1.247, 1.798, 8394, 130, -7), (3.2, 3.62, 5100, 201, -21),
           (3.88, 4.42, 6100, 150, -17), (3.882, 4.407, 7800, 90, -7), (1.908, 2.607, 11240, 200, -5),
           (2.403, 3.698, 9800, 160, -15.5), (3.007, 3.703, 7980, 130, -4), (2.407, 4.5, 7510, 50, -10),
           (3.683, 5.502, 6960, 89.5, -14.5), (4.792, 4.916, 7300, 250, -8)]


def grit(turns, grain_db=-1.5, pulsing=0.174, flicker_db=1.0, ripple_db=3.5, dry_db=-1):
    """Abrasion noise: grains tear hardest on the disc's high side and set the bracket's modes singing."""
    grains = rim(turns) * gain_of(grain_db * wander(1800) + flicker_db * wander(50))
    grains *= 1 + pulsing * np.cos(2 * np.pi * turns)
    grains = reflections(grains, ripple_db)
    scrape = along_cut(grains, [GRIT_TOP, GRIT_CORNER, GRIT_SIDE, GRIT_END], 5500, 16000)
    out = gain_of(dry_db) * scrape
    for start, end, hz, width, db in SINGING:
        part = grains[int(start * SR):int(end * SR)]
        mode = evened(shaped(part, lambda f: resonances([(hz, width, 0)], f)))
        add(out, start, gain_of(db) * mode * signal.windows.tukey(len(mode), .5))
    return out


# Chatter grows as the load pulls the speed down. Columns: turns_hz, relative level_db
CHATTER = [(230, -30.5), (272, -32.5), (300, -36.5), (370, -38.5), (460, -53)]
# Relative level of the grit. Columns: time_s, level_db
GRIT = [(0.82, -30), (0.88, -31), (1.05, -35.5), (2.0, -33.5), (2.6, -33), (2.85, -31), (3.35, -30.5),
        (4.6, -32), (5.3, -30), (5.6, -37.5)]
# The disc throws bursts of grit. Columns: start_s, end_s, gain_db
SPRAYS = [(1.263, 1.37, 5), (1.464, 1.539, 3), (1.719, 1.802, 4), (3.925, 3.99, 3), (4.806, 4.95, 0)]
# The shaking dashboard. Columns: time_s, relative once_a_turn_db, relative twice_a_turn_db
SHAKE = [(.75, -35, -38), (.86, -43.5, -44), (1.38, -34, -36.5), (1.55, -33.5, -47), (1.62, -38.5, -43),
         (1.8, -42, -46.5), (2.38, -43, -40), (2.5, -47, -29), (3.25, -30.5, -27.5), (3.9, -27.5, -32),
         (4.4, -28.5, -29.5), (4.58, -43.5, -35), (4.76, -28.5, -33), (4.98, -26.5, -37.5),
         (5.07, -42, -36), (5.55, -40, -34.5)]
# The disc is jammed in the screaming cut. Values: start_s, end_s
SCREAM = (4.995, 5.52)
# The eighth order meets a mode and screams in bursts. Columns: start_s, end_s, relative level_db
SCREAM_BURSTS = [(4.995, 5.078, -29.5), (5.082, 5.15, -26), (5.152, 5.226, -29), (5.228, 5.33, -28),
                 (5.33, 5.497, -27)]
# Orders in the scream. Columns: multiple of the shaft speed, relative level_db
SCREAM_ORDERS = [(5, -7.5), (8, 0), (16, -16), (17, -15)]
JITTER = .04  # share of the speed, at a roughness of one
SCREAM_EDGE_S, BURST_EDGE_S, SCREAM_DIP_DB = 0.03, .016, 1.2


def cutting(speed, shake_dip_db=4.5, judder_dip_db=2.93, rub_db=-14, scream_share=0.35, surge_db=1.1):
    """Order-locked excitation: shaking dashboard, chatter, scream and grit, all locked to the shaft."""
    screaming = held(SCREAM[0], SCREAM[1], SCREAM_EDGE_S, SCREAM_EDGE_S)
    rough = roughness(screaming)
    turns = np.cumsum(speed * (1 + JITTER * rough * wander(190))) / SR
    force = sum(gain_of(db) * held(start, end - ease / 2, BITE_S, ease + LIFT_S)
                for start, end, db, _, ease in CONTACTS)
    contact = sum(gain_of(db) * held(start, end, BITE_S, LIFT_S) for start, end, _, db, _ in CONTACTS)
    spray_db = sum(db * held(start, end, SWELL_S, SWELL_S) for start, end, db in SPRAYS)
    snag_db = sum(db * held(start, end, SNAG_S, SNAG_S) for start, end, db in SNAGS)

    shake = np.zeros(N)
    for k, trim_db in ((1, 1.003), (2, 1 + snag_db)):
        level = gain_of(curve(SHAKE, axis=k) + trim_db) * dips(60, shake_dip_db)
        shake += level * np.sqrt(2) * np.cos(2 * np.pi * k * turns)

    scream = np.zeros(N)
    for k, db in SCREAM_ORDERS:
        tone = np.sqrt(2) * np.cos(2 * np.pi * k * turns + .25 * wander(82))
        scream += gain_of(db) * dips(90, SCREAM_DIP_DB) * tone
    bursts = sum(gain_of(db) * held(start, end, BURST_EDGE_S, BURST_EDGE_S)
                 for start, end, db in SCREAM_BURSTS)

    chatter_db = read(CHATTER, curve(SPEED))
    # the screaming mode draws energy from the chatter
    spared = 1 - scream_share * screaming
    ring = gain_of(chatter_db) * dips(70, judder_dip_db) * spared * band_swelled(chatter(turns, rough))
    rub_colour = [(60, -47.5), (200, -14), (330, -0.5), (560, 5.0), (900, -21.5), (2000, -62.0)]
    rub = gain_of(chatter_db + rub_db) * evened(coloured(rng.standard_normal(N), rub_colour))

    scrape = contact * gain_of(curve(GRIT) + spray_db + surge_db * wander(14) - 2)
    tones = force * (shake + ring + rub + bursts * scream)
    return ports(tones + scrape * grit(turns), scrape * grit(turns), likeness=.7)


def brushing(level_db=-66, uneven_db=3):
    """Sliding friction: skin slides in fits over the trim between the taps."""
    sliding = np.interp(T, [6.4, 6.6, 8.8, 9.1], [0, 1, 1, 0])
    level = sliding * gain_of(level_db + uneven_db * wander(9.7) + 2 * wander(220))
    colour = [(400, -18.0), (1000, 8.5), (1600, 11.0), (3000, -16.0), (5500, -16.5),
              (9000, -12.5), (16000, -19)]
    return ports(*(level * evened(coloured(rng.standard_normal(N), colour)) for _ in range(2)),
                 likeness=.8)


# Ring of the switch. Columns: pitch_hz, relative level_db, t60_s
SWITCH_RING = [(3670, -15, 0.0096), (4320, -11, 0.016), (6260, -6.5, 0.0086), (8200, -5, 0.015),
               (8700, 0.5, 0.012), (9680, -5, 0.0088), (12200, -3, 0.0068), (14500, -8, .005)]


def switch():
    """Modal decay: a hard snap of small plastic parts."""
    t, out = np.arange(SR // 20) / SR, np.zeros(N)
    snap = sum(gain_of(db - 60 * t / t60) * np.sin(2 * np.pi * hz * t) for hz, db, t60 in SWITCH_RING)
    add(out, SWITCH[0], gain_of(SWITCH[1]) * snap * (1 - np.exp(-t / .00015)))
    return ports(out, np.zeros(N), likeness=0.8)


def scene():
    """Superposition: tool, hands and cabin together."""
    speed = shaft()
    return cabin() + grip() + motor(speed) + taps() + cutting(speed) + brushing() + switch()


EDGE_HZ = 15800


def record(dry):
    """Band limiting: a linear-phase low-pass at EDGE_HZ."""
    lowpass = signal.firwin(511, EDGE_HZ, window=("kaiser", 9), fs=SR)
    return signal.oaconvolve(dry, lowpass[None], "same", axes=1)


dry = scene()
out = record(dry)
unload_wav(out)
```